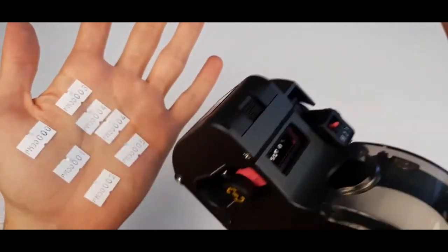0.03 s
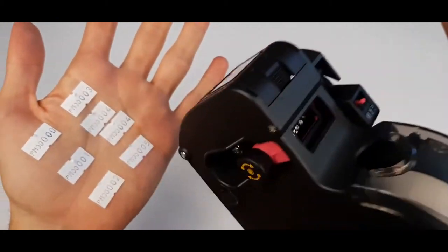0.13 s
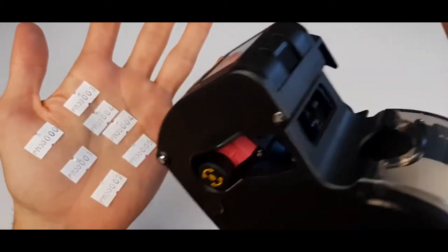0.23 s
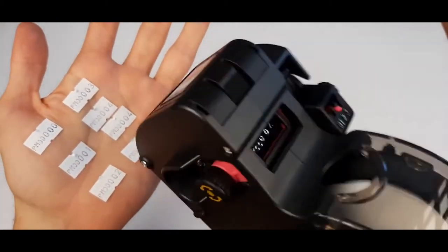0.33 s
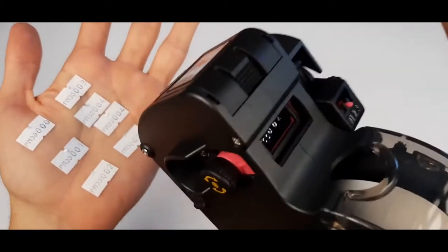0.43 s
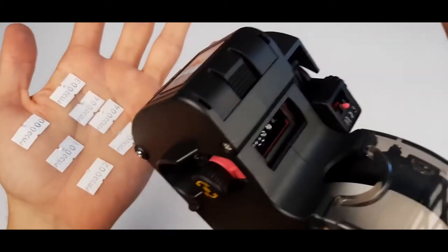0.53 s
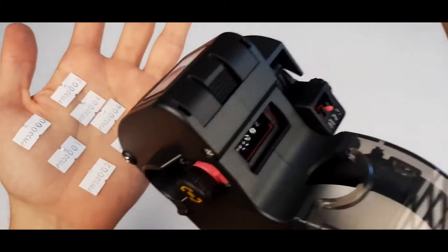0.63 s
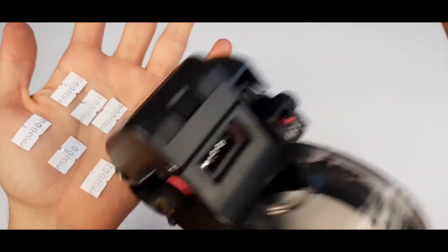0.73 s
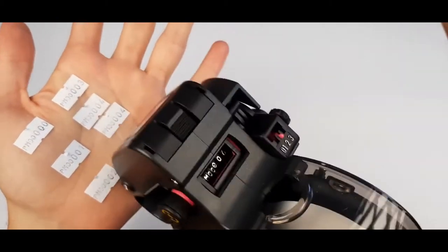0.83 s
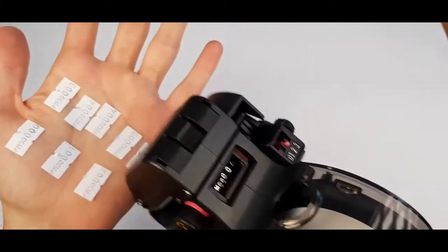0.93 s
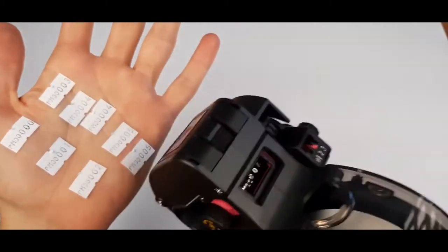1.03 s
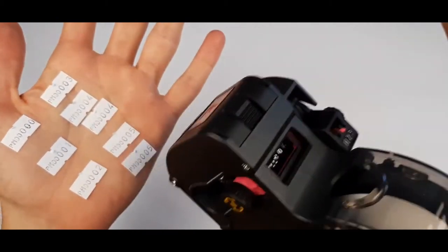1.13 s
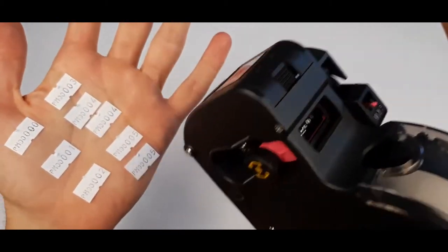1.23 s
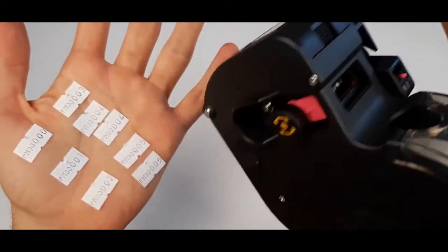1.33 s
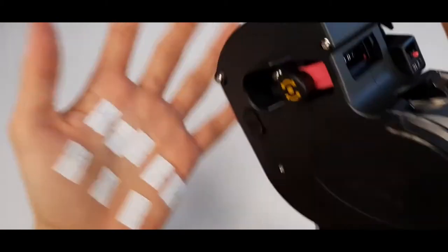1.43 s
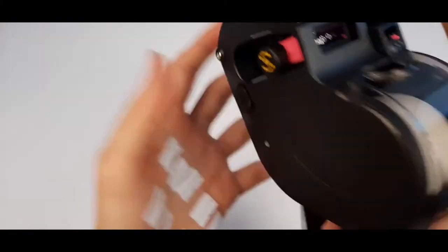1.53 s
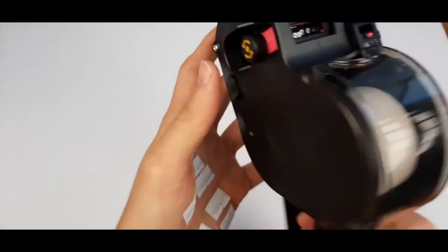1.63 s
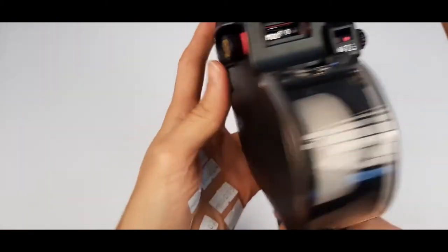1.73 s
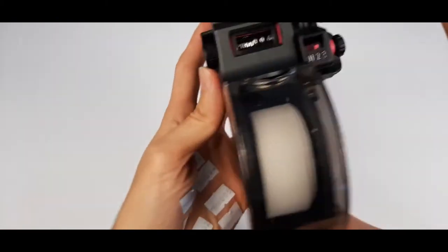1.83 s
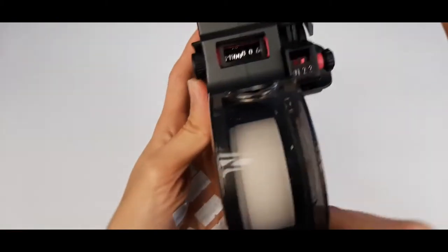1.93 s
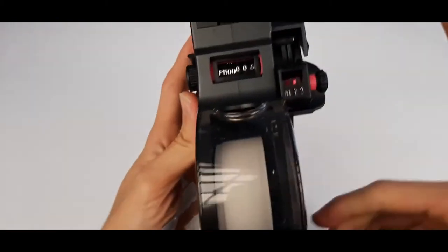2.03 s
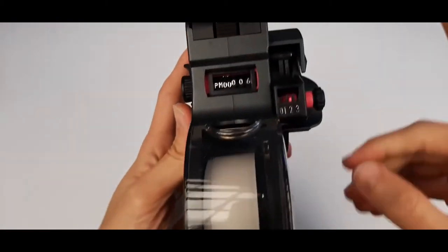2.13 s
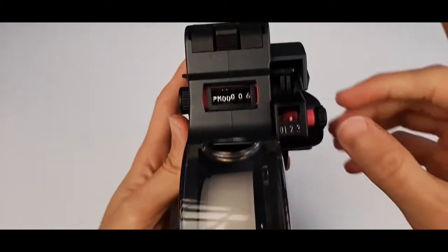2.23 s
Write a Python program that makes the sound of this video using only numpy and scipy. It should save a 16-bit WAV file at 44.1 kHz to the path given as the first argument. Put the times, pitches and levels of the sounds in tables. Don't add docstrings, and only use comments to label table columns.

```python
import sys
import numpy as np
from scipy import signal
from scipy.fft import rfft, irfft
from scipy.io import wavfile
from scipy.ndimage import uniform_filter1d

SR = 44100
rng = np.random.default_rng(int(sys.argv[2]) if len(sys.argv) > 2 else 0)


def field_ratio(decibels):
    return 10 ** (np.asarray(decibels, dtype=float) / 20)


def to_wav(s):
    ch = np.atleast_2d(s).T
    pcm = np.round(np.clip(ch, -1, 1) * 32767)
    wavfile.write(sys.argv[1], SR, pcm.astype(np.int16))


N = 101430
LEAD = 13230

# t/s, blow level/dB, chatter/s, brightness/dB, loudest part f/Hz
TRIGGER_BLOWS = [(.2318, -27, 0.0075, -15.5, 1900), (.2455, -17.5, 0.0025, -3.5, 1200),
                 (.2485, -18.5, 0.0048, -13, 1500), (.2537, -12.5, 0.002, 3, 4290),
                 (.2556, -11.5, 0.0038, -8, 1250), (.262, -17.5, 0.0032, -17, 760),
                 (.267, -25, 0.0065, -15.5, 1670), (.277, -27.5, .004, -15.5, 2300),
                 (.299, -28.5, 0.015, -17, 1045), (.370, -28, 0.0044, -16, 2250),
                 (.374, -27, 0.0095, -7, 4790), (.384, -28, 0.0067, -25.5, 1920),
                 (.3953, -24, 0.0046, -11.5, 2600), (.4028, -13, 0.0055, 0.5, 5500),
                 (.4075, -22, 0.0035, -7, 1280), (.411, -25, 0.01, -11.5, 2160)]
# t/s, blow level/dB, chatter/s, brightness/dB, loudest part f/Hz
LOOSE_TICKS = [(.634, -63.5, 0.0032, 3.5, 7200), (.8275, -49, 0.0054, -23, 724),
               (.8300, -38.5, 0.0041, 6, 5100), (.867, -55, 0.0085, -23, 4560),
               (.890, -47, .006, -12.5, 2570), (.9335, -51.5, 0.0038, -9, 1290),
               (1.018, -59.5, 0.0027, -14, 5150), (1.0347, -57, 0.0039, -11.5, 3830),
               (1.113, -74, 0.0026, -4, 4082), (1.414, -72, 0.0051, -36, 930),
               (1.470, -73, .004, -13, 3090), (1.490, -60, 0.011, -49, 1083),
               (1.581, -54, 0.0052, -15, 5800), (1.624, -39, 0.0046, -8.5, 4900),
               (1.7255, -56.5, 0.0032, -30, 1420), (1.768, -62.5, 0.0043, -20.5, 1932),
               (1.803, -61, 0.012, -33, 1082), (1.8393, -53.5, 0.005, -1, 4460),
               (1.856, -56.5, 0.011, -18, 1416), (1.9625, -55, 0.0094, -15, 4780),
               (1.9915, -44.5, 0.0036, -46, 1018), (2.102, -69.5, 0.0041, -30, 1190)]
# t/s, blow level/dB, chatter/s, brightness/dB, loudest part f/Hz
EARLIER_CLACK = [
    (-0.26, -13, 0.072, -4.5, 3300),
]
# t/s, length/s, level/dB, brightness/dB, loudest part f/Hz
RUBS = [(0.211, 0.027, -63.5, -74, 1410), (0.241, 0.0048, -57, -47, 1480), (0.265, 0.14, -41, -13.5, 1126),
        (0.353, 0.15, -40.5, -11, 1513), (0.834, 0.034, -58.5, -11, 1488), (0.902, 0.11, -69, -13, 2500),
        (0.995, 0.044, -64.5, -15.5, 2450), (1.448, 0.098, -74, -51, 1022), (1.631, 0.044, -61, -8.5, 2000),
        (1.687, 0.21, -74.5, -16.5, 1470), (1.802, 0.23, -69.5, -17, 1331),
        (1.964, 0.059, -65.5, -32, 2100), (1.97, 0.045, -59, -20, 1103), (2.021, 0.26, -81.5, -12.5, 2017)]
# f/Hz, level/dB
SHELL_MODES = [(749, -8), (937, -8), (1035, -1.5), (1301, 2), (1620, 4.5), (1916, -0.5), (2162, 1.5),
               (2420, 1), (2714, -5.5), (3002, -0.5), (3300, -2.5), (4400, -7), (5459, -9.5), (6500, -8)]
# f/Hz, level/dB
CRACK_COLOUR = [(300, -18.5), (800, 0), (2000, 11), (5500, 6.5), (8500, -2), (13000, -3), (16500, -16)]
# t/s, level/dB, f/Hz, t60/s
PANELS = [(.232, -32, 1020, .04), (.232, -31, 1320, .04), (.232, -35.5, 2080, .03), (.2455, -24, 1236, .03),
          (.2455, -24, 2120, .025), (.2533, -15.5, 746, .05), (.2537, -11.5, 1064, .04),
          (.2537, -20, 1282, .04), (.254, -16, 1620, .04), (.254, -15, 1923, .035), (.254, -18, 2720, .025),
          (.254, -22.5, 3170, .025), (.254, -24, 5041, .02), (.254, -19.5, 5342, .02),
          (.374, -26.5, 905, .04), (.375, -34.5, 1470, .03), (.396, -24, 900, .04),
          (.4035, -23.5, 1012, .05), (.4038, -15.5, 2199, 0.026), (.4038, -18, 2426, .03),
          (.4035, -20.5, 2810, .025), (.4035, -15, 3264, .02), (.4035, -17.5, 4550, .02),
          (.4075, -20, 1284, .03)]
# t/s, level/dB, f/Hz, t60/s
CATCHES = [(.830, -50, 1960, 0.036), (.8315, -37.5, 4020, 0.017), (.8305, -42, 5630, 0.021),
           (.830, -41, 7660, .012), (.890, -41.5, 2665, 0.019), (.890, -44.5, 2200, 0.021),
           (.9345, -49, 2205, 0.022), (.936, -48.5, 1276, 0.019), (.9345, -51, 5447, 0.017),
           (1.581, -48.5, 7060, 0.024), (1.581, -53.5, 3000, .025), (1.583, -50, 1073, 0.048),
           (1.624, -35, 3080, .03), (1.624, -33, 5390, 0.024), (1.624, -45, 4640, 0.025),
           (1.624, -41, 1822, 0.026), (1.624, -38, 7160, .02), (1.976, -53.5, 1448, 0.05),
           (1.984, -52, 2166, 0.041), (1.984, -54, 1018, 0.037), (1.9915, -50, 1025, 0.039),
           (1.9915, -48.5, 2155, 0.033), (2.002, -47.5, 2094, 0.035)]
# t/s, level/dB, f/Hz, t60/s
THUDS = [
    (.2535, -26, 345, .035),
    (0.2545, -29, 245, 0.07),
    (.256, -41, 103, 0.2),
    (0.402, -34, 283, 0.03),
    (0.405, -46, 112, 0.12),
    (.395, -37, 320, .03),
    (.410, -38, 350, .03),
    (.256, -43, 165, .15),
]
# t/s, level/dB, f/Hz, t60/s
SPRING = [
    (.26, -66, 596, 3.4),
    (.41, -71, 575, 2.1),
    (0.411, -79, 1976, 2.0),
    (0.409, -47, 985, .45),
]
# f/Hz, level/dB
RIGHT_TONE = [(100, -1), (270, 10.5), (600, 0), (2000, 0), (15000, 2)]
# f/Hz, likeness/0-1
PORTS_SAME = [(500, 1), (1500, 0.73), (3000, 0.55), (12000, 0.11)]
# t/s, left minus right level/dB
HAND_PAN = [
    (0, 1.5),
    (.45, 5.5),
    (0.901, 7),
    (1.6, 7.5),
    (2.3, 4.5),
]
# t/s, left level/dB, right level/dB
ECHOES = [(.0021, -23.5, -9.5), (.0043, -20, -20), (.007, -19.5, -27), (.011, -25, -31)]
# f/Hz, t60/s
ROOM_T60 = [(150, 1), (500, 0.37), (1200, .4), (3000, 0.34), (7000, 0.39), (11000, 0.16), (15000, 0.24)]
# f/Hz, level/dB
ROOM_TONE = [(200, 15), (550, 13), (1000, 8), (4000, 8.5), (8000, -3.5), (10000, -2.5), (15000, -1)]
# f/Hz, level/dB per Hz
HUSH_COLOUR = [(34, -29.5), (52, -2), (110, 1.5), (300, -4.5), (600, -14), (1200, -16.5), (4500, -31.5),
               (16500, -32.5)]
# f/Hz, likeness/0-1
HUSH_SAME = [(60, 0.61), (240, 0.54), (950, 0.11), (3770, 0.02), (15000, 0.02)]
# f/Hz, left minus right level/dB
HUSH_PAN = [(60, 4.1), (240, 1.7), (950, 3.5), (3770, 3), (15000, 2)]
# t/s, level/dB
RUMBLE_SWELL = [
    (0, -5),
    (.6, 2),
    (1.299, -3.5),
    (1.6, 1),
    (2.1, 3.5),
    (2.3, 6.5),
]

SLIPS_PER_S, SLIP_SPREAD_DB = 8000, 5.5
FIRST_SLIP, SETTLE_DB, RISE = 2, -5, 0.18
SHELL_T60_S, PART_T60_S = 0.022, 0.012
SHELL_DB, PART_DB, SHARE_DB = -1, -2.5, 3.5
TICK_SHELL_DB, RUB_SHELL_DB = -1, -11.5
DULL_HZ, DULL_OCTAVES = 2257, 0.77
SMALL_HZ = 760
TURNED_S, DAMPED = 1.7, 1.2
PANEL_RISE_S, JOLT_RISE_S, ALIKE_BELOW_HZ, WAVER_DB = 0.0006, 0.0033, 2600, 2.6
LEFT_LEADS_S, ROOM_DB = 0.00005, -15
RING_WET_DB = -7
HUSH_DB, WHINE_HZ, WHINE_WIDTH_HZ, WHINE_DB = -68.5, 7100, 330, 11


def evened(x):
    return x / np.sqrt(np.mean(x ** 2) + 1e-20)


def read(points, hz):
    f, value = np.transpose(points)
    return np.interp(np.log(hz + 1), np.log(f + 1), value)


def add(mix, s, sound):
    part = mix[LEAD + round(s * SR):][:len(sound)]
    part += sound[:len(part)]


def mode(hz, t60, size=4096):
    t = np.arange(size) / SR
    ring = field_ratio(-60 * t / t60) * np.sin(2 * np.pi * hz * t)
    return ring / np.linalg.norm(ring)


def causal(db):
    log = np.log(field_ratio(db))
    return np.fft.ifft(np.exp(log - 1j * signal.hilbert(log).imag)).real[:512]


def slips(count):
    chance, size, side = rng.random((count, 3, 8192)).transpose(1, 0, 2)
    height = field_ratio(-SLIP_SPREAD_DB * np.log(size + 0.008))
    return (chance < SLIPS_PER_S / SR) * height * np.sign(side - 0.5)


def struck(force, bright_db, part_hz, seed, s, shell_db):
    bins = abs(np.fft.fftfreq(1024, 1 / SR))
    shell = 0
    for (hz, db), z in zip(SHELL_MODES, seed):
        shell = shell + field_ratio(db + SHARE_DB * z) * mode(hz, SHELL_T60_S * (1500 / hz) ** 1.1)
    part = mode(part_hz, PART_T60_S * np.sqrt(1200 / part_hz))
    body = field_ratio(SHELL_DB + shell_db) * shell / np.linalg.norm(shell) + field_ratio(PART_DB) * part
    click = causal(read(CRACK_COLOUR, bins))
    body[:512] += click / np.linalg.norm(click)

    corner = min(max(DULL_HZ, part_hz), 5000)
    top = np.clip(np.log2((bins + 1) / corner) / DULL_OCTAVES, 0, 1)
    body = signal.fftconvolve(body, causal((bright_db + 13.5) * top))

    bass_cut = SMALL_HZ * (DAMPED if s > TURNED_S else 1)
    highpass = signal.butter(4, bass_cut, "high", fs=SR, output="sos")
    return signal.sosfilt(highpass, signal.fftconvolve(force, body))


def gun():
    out, t = np.zeros(N + LEAD), np.arange(8192) / SR
    hits = list(EARLIER_CLACK) + list(TRIGGER_BLOWS) + list(LOOSE_TICKS)
    for (s, db, chatter, bright_db, hz), force in zip(hits, slips(len(hits))):
        swell = np.minimum(t / chatter / RISE, 1)
        settle = field_ratio(SETTLE_DB * t / chatter) / (1 + (t / chatter) ** 8)
        force = force * swell * settle
        force[round(RISE * chatter * SR)] += FIRST_SLIP
        seed = rng.standard_normal(len(SHELL_MODES))
        sound = struck(force[:2048], bright_db, hz, seed, s, TICK_SHELL_DB * (s > 0.6))
        peak = np.sqrt(uniform_filter1d(sound ** 2, 128).max())
        add(out, s, field_ratio(db) * sound / peak)
    for (s, length, db, bright_db, hz), force in zip(RUBS, slips(len(RUBS))):
        fade = np.cos(np.pi / 2 * t / t[-1])
        stroke = t / length * np.exp(-3 * (t / length) ** 0.79) * fade
        seed = rng.standard_normal(len(SHELL_MODES))
        sound = struck(force * stroke, bright_db, hz, seed, s, RUB_SHELL_DB)
        add(out, s, field_ratio(db) * sound / np.sqrt(np.sum(sound ** 2) / (length * SR)))
    return out


def ports():
    left, other = rfft(gun()), rfft(gun())
    same = np.clip(read(PORTS_SAME, np.fft.rfftfreq(N + LEAD, 1 / SR)), 0, 1)
    right = same * left + np.sqrt(1 - same ** 2) * other
    return irfft(np.array([left, right]), N + LEAD)


def sides(hz):
    return field_ratio(read(RIGHT_TONE, hz) / 2) ** np.array([-1, 1])


def panels():
    out, t = np.zeros((2, N + LEAD)), np.arange(4096) / SR
    rows = list(PANELS) + list(CATCHES)
    phases = rng.uniform(-np.pi, np.pi, (len(rows), 2))
    for (s, db, hz, t60), (start, shift) in zip(rows, phases):
        shift = 0.56 * shift / (1 + (ALIKE_BELOW_HZ / hz) ** 4)
        envelope = field_ratio(db - 60 * t / t60) * np.minimum(t / PANEL_RISE_S, 1)
        for port, gain, phase in zip(out, sides(hz), (start, start + shift)):
            add(port, s, gain * envelope * np.sin(2 * np.pi * hz * t + phase))
    return out


def jolts_and_spring():
    out, t = np.zeros((2, N + LEAD)), np.arange(N) / SR
    for s, db, hz, t60 in list(THUDS) + list(SPRING):
        drift = uniform_filter1d(rng.standard_normal(N), 1500)
        waver = evened(uniform_filter1d(drift, 1500))
        envelope = field_ratio(db - 60 * t / t60 + WAVER_DB * waver) * np.minimum(t / JOLT_RISE_S, 1)
        ring = envelope * np.sin(2 * np.pi * hz * t + 1.1 * waver)
        for port, gain in zip(out, sides(hz)):
            add(port, s, gain * ring)
    return out


def room(x, feed):
    k = np.arange(1024)
    near = np.array([np.sinc(k - 16), np.sinc(k - 16 - LEFT_LEADS_S * SR)])
    jitter = rng.integers(0, 12, (len(ECHOES), 2))
    for (s, left_db, right_db), j in zip(ECHOES, jitter):
        near[[0, 1], 16 + round(s * SR) + j] += field_ratio(np.array([left_db, right_db]))

    taps, slots = np.zeros((2, SR)), np.arange(300, SR - 20, 10)
    at = slots + rng.integers(0, 10, (2, len(slots)))
    np.put_along_axis(taps, at, rng.choice([-1., 1.], at.shape), 1)
    hz, t, z = signal.stft(taps + 0.62 * taps[::-1], SR, nperseg=256)
    decay_db = read(ROOM_TONE, hz)[:, None] - 60 * t / read(ROOM_T60, hz)[:, None]
    tail = signal.istft(z * field_ratio(decay_db), SR, nperseg=256)[1]
    tail = tail / np.linalg.norm(tail[0])

    wet = field_ratio(ROOM_DB) * signal.fftconvolve(feed[:1], tail, axes=1)[:, LEAD:LEAD + N]
    direct = signal.fftconvolve(x, near, axes=1)[:, LEAD + 16:LEAD + 16 + N]
    pan_db = np.interp(np.arange(N) / SR, *np.transpose(HAND_PAN))
    pan = field_ratio(pan_db / 2) ** np.array([[1], [-1]])
    return pan * wet + pan * direct


def hush():
    frames, hz = N // 256 + 5, np.fft.rfftfreq(1024, 1 / SR)
    a, b, c, d, patches = rng.standard_normal((frames, 513, 5)).T
    patches = evened(uniform_filter1d(uniform_filter1d(patches, 8, 0), 14, 1))
    same = np.clip(read(HUSH_SAME, hz), -1, 1)[:, None]
    left = a + 1j * b
    right = same * left + np.sqrt(1 - same ** 2) * (c + 1j * d)
    pan = field_ratio(read(HUSH_PAN, hz) / 2)[:, None]
    z = np.array([left * pan, right / pan])

    swell_db = np.interp(np.arange(frames) * 256 / SR, *np.transpose(RUMBLE_SWELL))
    swell_db = swell_db / (1 + (hz[:, None] / 500) ** 2)
    whine_db = WHINE_DB * np.exp(-((hz - WHINE_HZ) / WHINE_WIDTH_HZ) ** 2)
    z *= field_ratio((read(HUSH_COLOUR, hz) + whine_db)[:, None] + 0.54 * patches + swell_db)
    air = signal.istft(z, nperseg=1024, noverlap=768)[1][:, :N]
    return field_ratio(HUSH_DB + 0.5) * evened(air)


def scene():
    blows = ports()
    clear = jolts_and_spring() + panels()
    return room(blows + clear, blows + field_ratio(RING_WET_DB) * clear) + hush()


def top_cut(x):
    return signal.sosfilt(signal.butter(12, 17150, fs=SR, output="sos"), x)


def record(dry):
    ceiling, edge_hz = 0.93, 16400
    held = dry / (1 + (abs(dry) / ceiling) ** 6) ** (1 / 6)
    lowpass = signal.firwin(127, edge_hz, fs=SR)[None]
    return top_cut(signal.oaconvolve(held, lowpass, "same"))


dry = scene()
out = record(dry)
to_wav(out)
```